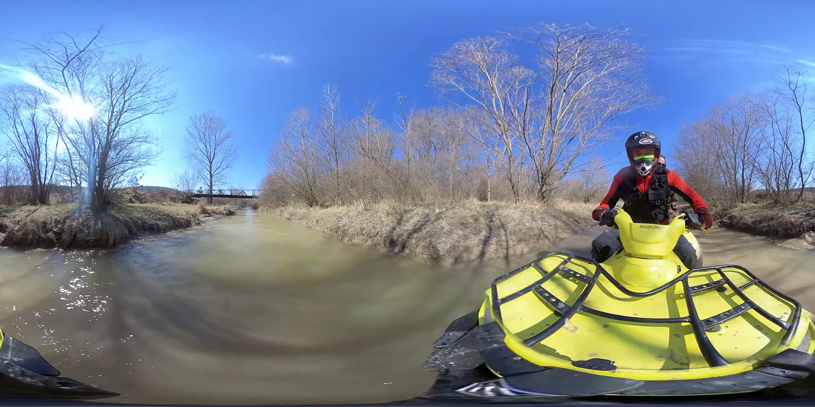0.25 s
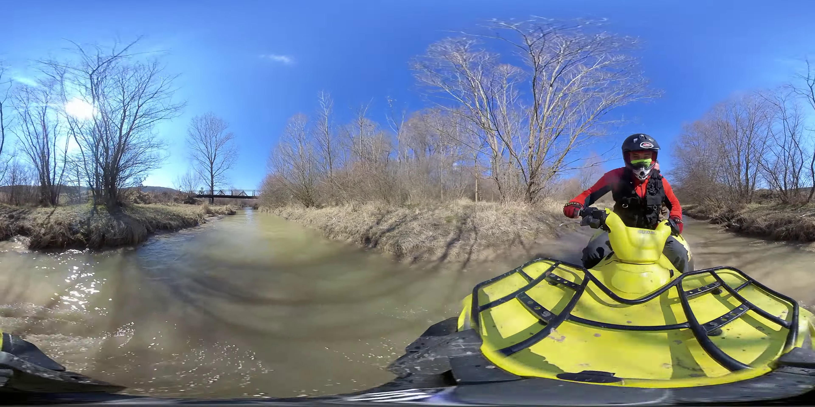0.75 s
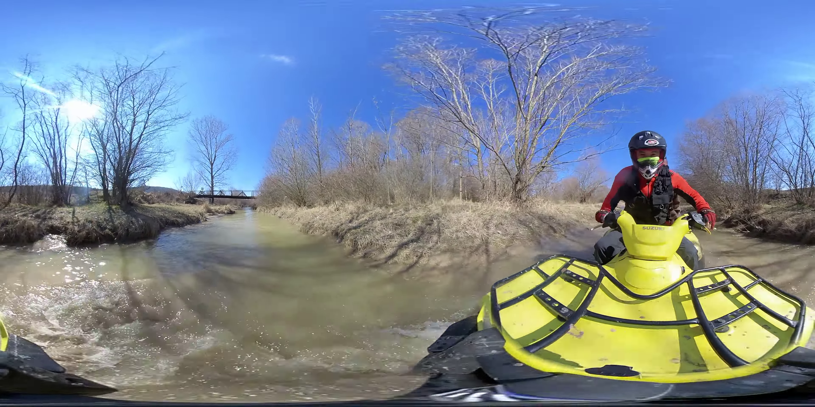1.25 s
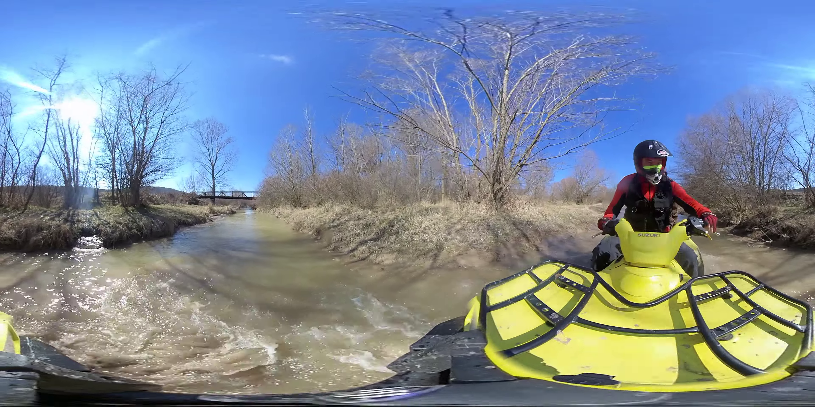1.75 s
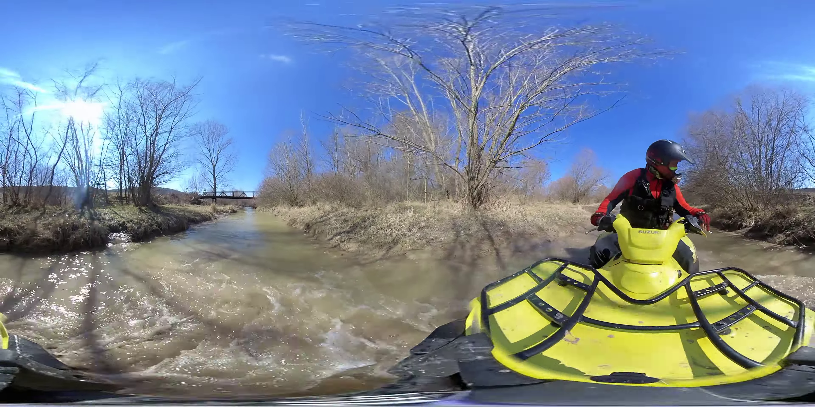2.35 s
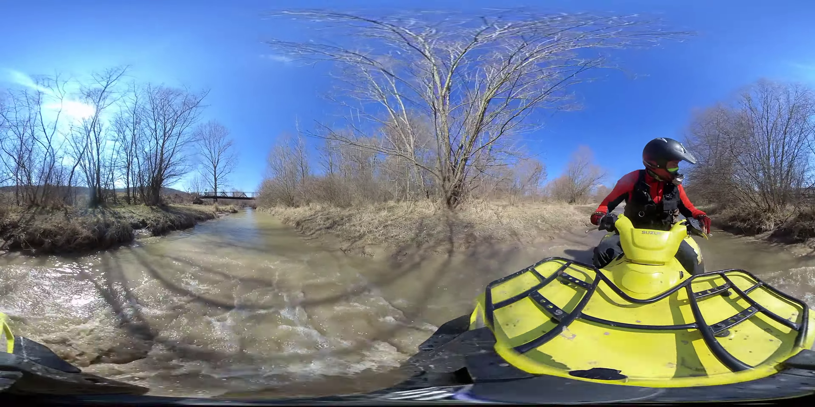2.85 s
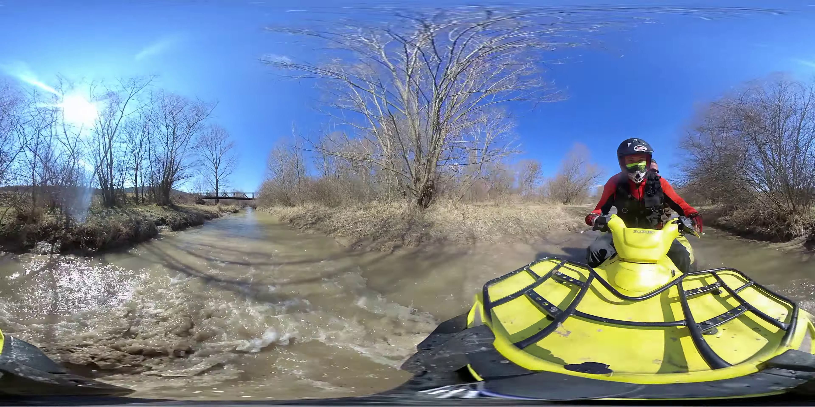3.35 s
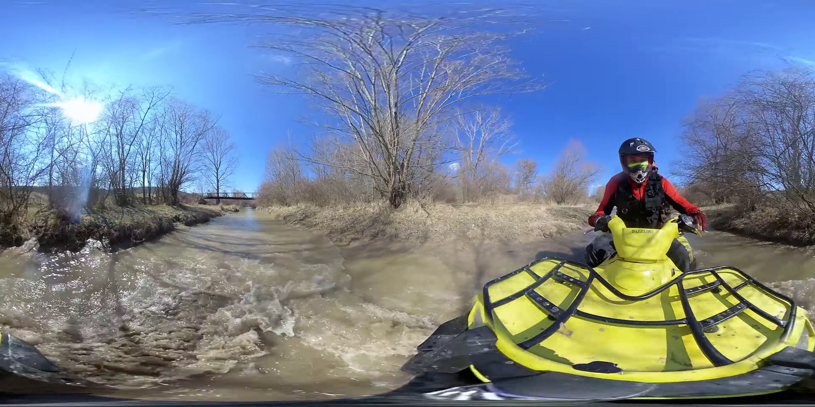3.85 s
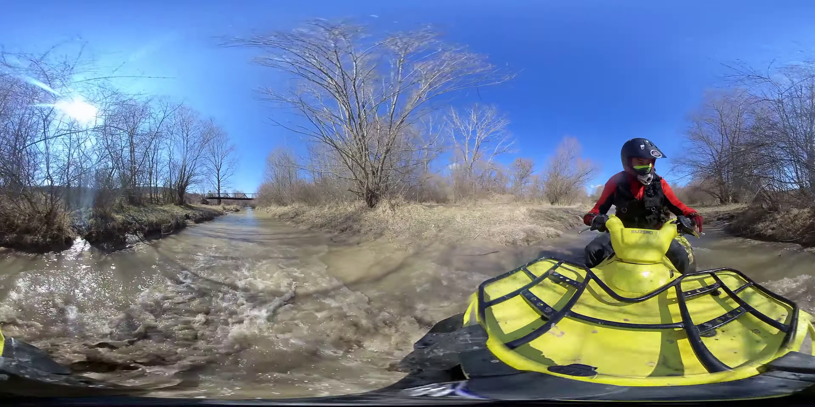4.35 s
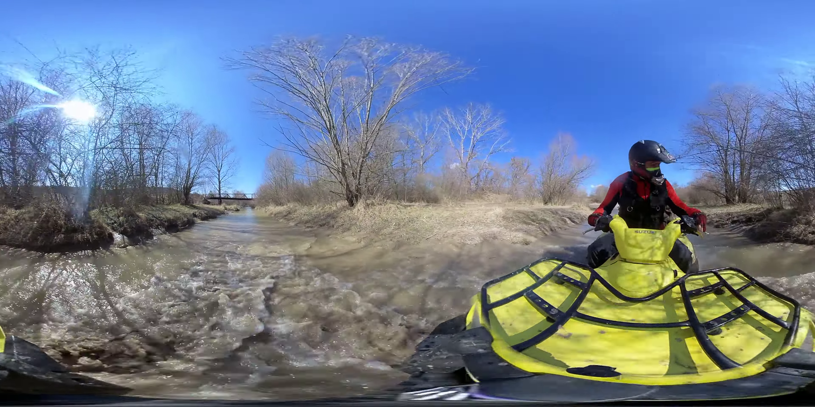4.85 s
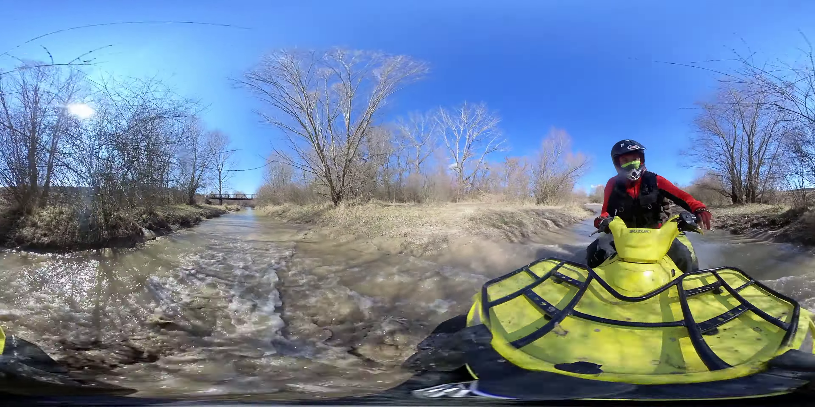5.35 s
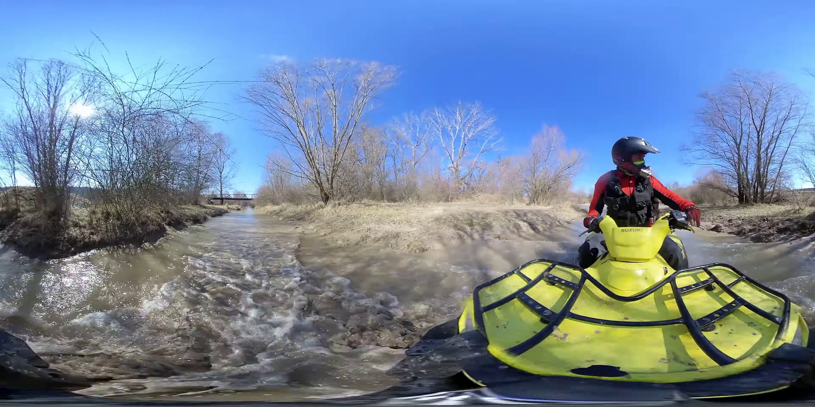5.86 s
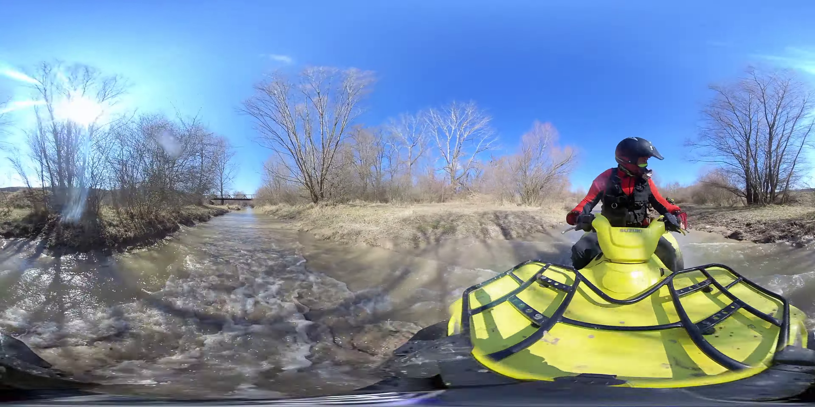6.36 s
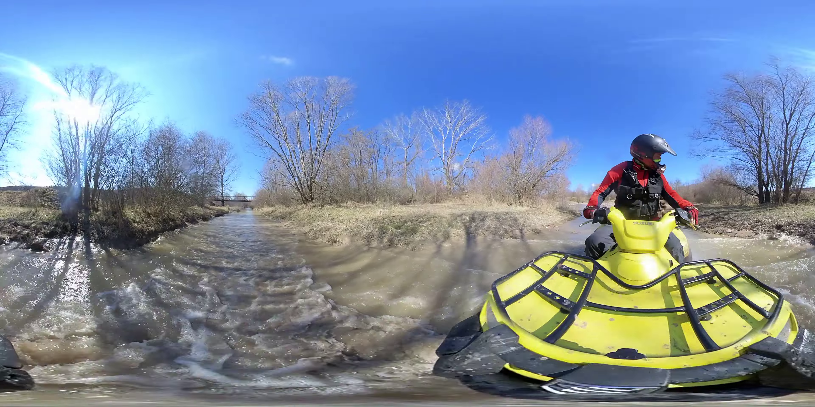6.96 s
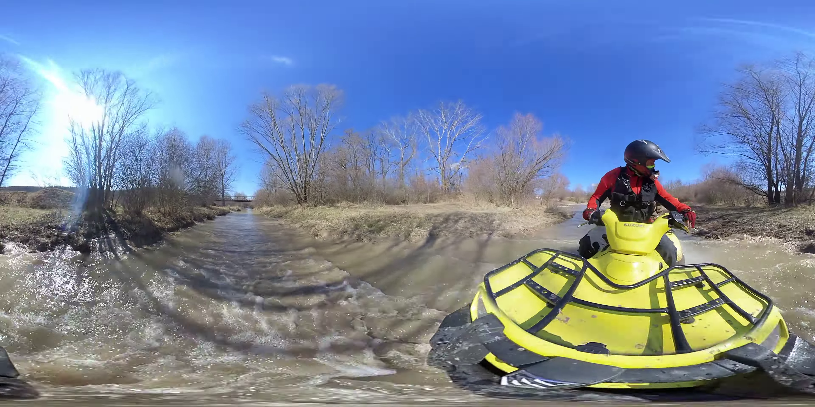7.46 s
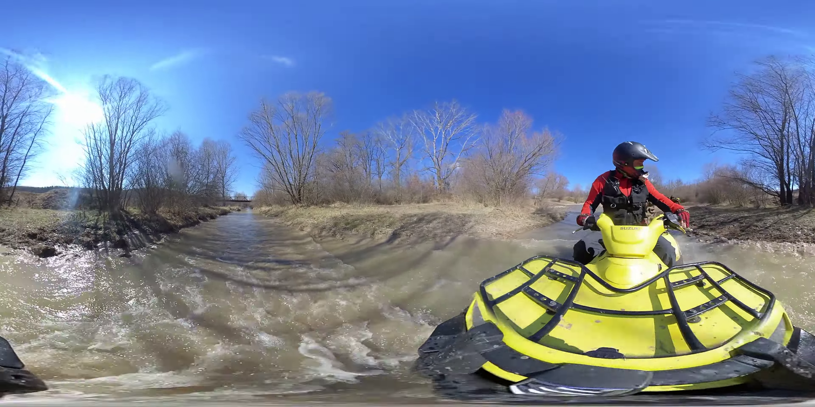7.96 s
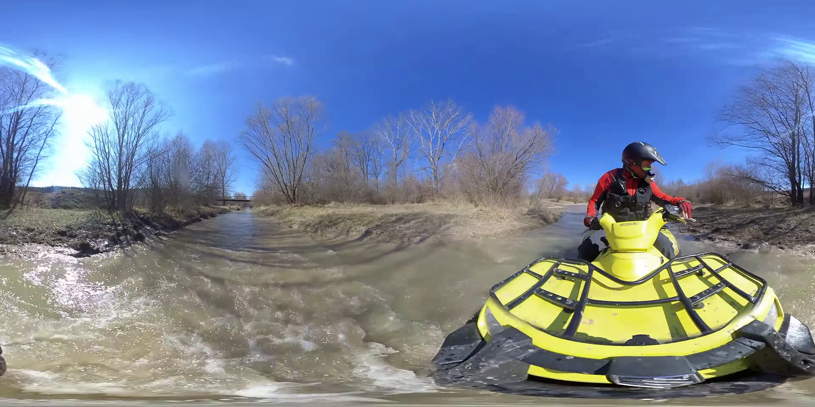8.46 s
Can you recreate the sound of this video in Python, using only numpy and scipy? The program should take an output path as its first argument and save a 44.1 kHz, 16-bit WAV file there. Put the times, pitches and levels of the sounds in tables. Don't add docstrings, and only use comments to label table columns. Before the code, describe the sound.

A quad bike wades a shallow creek outdoors, heard from microphones fixed to its front rack. A low, buzzing engine throb dominates, sagging near two seconds then pulling again. Loose panel knocks and dry clamp ticks cluster early, mostly at right, over churning water and fine spray. Later the bed gets rougher, with heavy rumbling, stone thumps and hard jolts that overload the input.

```python
import sys
import numpy as np
from scipy import signal
from scipy.fft import rfft, irfft, next_fast_len
from scipy.io import wavfile
from scipy.ndimage import uniform_filter1d, map_coordinates

SR = 44100
rng = np.random.default_rng(int(sys.argv[2]) if len(sys.argv) > 2 else 0)


def wav_out(sig):
    wavfile.write(sys.argv[1], SR, np.round(np.clip(np.atleast_2d(sig).T, -1, 1) * 32767).astype(np.int16))


def amplitude_ratio(level_db):
    exponent = np.asarray(level_db, float) / 20
    return 10 ** exponent


N = 384111

# t/s, f/Hz
CYCLE = [(0, 26.6), (.7, 29.3), (1.33, 29), (1.5, 22), (2, 19.3), (2.25, 21.4), (2.64, 26.8), (3.3, 28.2),
         (4.15, 27.8), (4.8, 28.7), (5.72, 28.1), (5.97, 25.3), (6.65, 26.3), (7.1, 25.2), (7.52, 25.2),
         (7.9, 30.6), (8.12, 23.2), (8.71, 25.5)]
# t/s, level/dB
LOAD = [(0, 2), (.5, 1), (1, 2), (1.52, -1), (2, -6), (2.5, 2.5), (3.1, 0.5), (3.9, 1.5), (4.2, -4),
        (4.6, 1), (5.6, 0.5), (6.1, -2), (6.6, 1), (7.3, -3.5), (7.65, 3), (7.9, -0.5), (8.25, -0.5),
        (8.71, -7.5)]
# f/Hz, level/dB
MOUNT = [(40, -40), (56, -28), (66, -22), (76, -9.5), (86, -8), (103, -8), (114, -14), (128, -18),
         (142, -17), (170, -25), (200, -29), (227, -23), (255, -30), (283, -22)]
# f/Hz, left-right/dB
MOUNT_PAN = [(60, -4), (85, -4), (110, 4.5), (140, 2), (200, 3)]
# f/Hz, width/Hz, level/dB
FRAME = [(112.3, 43.2, -5), (186.3, 67.7, -0.5), (235, 29.7, -1.5), (284.6, 35.7, -4), (466, 68.8, -9.5)]
# f/Hz, likeness/0-1
ALIKE = [(30, .1), (100, 0.55), (160, 0.85), (230, 0.31), (300, 0.88), (390, 0.47), (480, 0.6), (800, 0.34),
         (1500, 0.24), (3000, 0.13)]


def engine():
    cycle_hz, load_db = curves(CYCLE)[0], curves(LOAD)[0]
    phase = 2 * np.pi * np.cumsum(cycle_hz) / SR
    tones = 0
    for order in range(2, 11):
        port_drift = .28 * np.array([wobble(7), wobble(7)])
        drift = .05 * order * wobble(5) + order * order + port_drift
        port_db = 1.1 * np.array([wobble(8), wobble(8)])
        size = amplitude_ratio(along(MOUNT, order * cycle_hz) + load_db + port_db)
        tones = tones + size * np.sin(order * phase + drift)

    throb = amplitude_ratio(0.86 * np.cos(phase))
    shake = filtered(throb * rush(ALIKE, patchy_db=1.0), resonances(FRAME))
    shaken = shaking(db=-18, follows=0.1644)
    rumble = amplitude_ratio(8) * shaken * unit(filtered(shake, lambda hz: hz ** 2 / (hz ** 2 + 60 ** 2)))

    sway = resonances([(92.5, 23.0, 0)])
    bounce = filtered(rng.standard_normal(N), lambda hz: sway(hz) ** 2)
    bounce = amplitude_ratio(2.5) * shaken * unit(bounce)

    def tilt(hz):
        return ports(hz) * amplitude_ratio(along(MOUNT_PAN, hz) * [[.5], [-.5]])

    return filtered(amplitude_ratio(3) * tones, tilt) + bounce + filtered(rumble, ports)


# t/s, peak level/dB, left-right/dB
SLAMS = [(0.419, -13, -2), (2.176, -23, 0), (3.108, -7, -10), (6.377, -10, 0), (0.552, -9, 14),
         (1.117, -12, -8), (1.807, -14, 5), (2.033, -19, -12), (2.227, -4, -2), (2.396, -11, -12),
         (2.541, -9.5, -19), (5.549, 0, -5), (5.901, -17, 19), (6.555, -9, 9), (7.234, -6, -22),
         (7.33, 0.5, 3), (7.727, -32, -5), (8.234, -7, 2), (8.349, -6, -15), (8.45, -3.5, -13),
         (8.601, -2, -26)]


def slams():
    out, t = np.zeros((2, N + SR)), np.arange(SR // 20) / SR
    fall = amplitude_ratio(-60 * t / 0.015) * (1 - np.exp(-t / 0.005))
    thud = 0.33 * np.sin(2 * np.pi * (330 * t + 12000 * t * t))
    for s, db, pan_db in SLAMS:
        crack = fall * (1.9 * rng.standard_normal(len(t)) + thud)
        crack[round(0.001 * SR)] += 3
        level_db = db + 15.0 + pan_db * np.array([[.5], [-.5]])
        out[:, round(s * SR):][:, :len(t)] += amplitude_ratio(level_db) * crack
    rack = resonances([(600, 500, 0), (1400, 900, -6)])
    return filtered(out[:, :N], lambda hz: rack(hz) / (1 + 1j * hz / 4000))


# t/s (peak), rise/dB, half length/s
SINGS = [(.23, 3, .03), (.32, 4, .02), (1.77, 1, .04), (1.82, 10, .03), (1.96, 6.5, .03), (2.055, 7, .03),
         (2.29, 3.5, .03), (3.05, 1, 0.046), (3.87, 4.5, .05), (4.42, -0.5, 0.055), (5.66, -5, 0.043),
         (5.9, 0.5, .05), (6.1, 0.5, 0.055), (7.1, 0, 0.043), (7.57, 3, 0.034), (8.55, 3, 0.036),
         (8.68, 7, .03)]
# t/s, peak level/dB, ring f/Hz
KNOCKS = [(0.113, -26, 620), (0.267, -10, 620), (0.356, -15, 630), (0.419, -12, 666), (0.462, -8.5, 566),
          (0.48, -11, 667), (0.489, -15, 690), (0.553, -11, 575), (0.662, -8.5, 686), (0.789, -14, 625),
          (0.881, -17, 670), (0.947, -10.5, 600), (1.119, -18, 729), (1.173, -8.5, 690), (1.58, -12, 634),
          (1.744, -13, 670), (1.806, -8.5, 616), (1.834, -19, 670), (1.952, -12, 665), (2.034, -8, 700),
          (2.072, -2.5, 680), (2.128, -9, 660), (2.176, -14, 660), (2.228, -4.5, 616), (2.419, -6, 633),
          (2.542, -8, 673), (2.616, -13, 586), (2.876, -16.5, 600), (2.973, -21, 632), (3.035, -19, 636),
          (3.112, -12.5, 577), (3.189, -11.5, 633), (3.23, -6.5, 643), (3.284, -23, 647), (3.392, -12, 583),
          (3.622, -11, 570), (3.746, -13, 630), (4.139, -13, 600), (4.673, -12.5, 670), (4.779, -5.5, 638),
          (5.153, -10.5, 620), (5.235, -9.5, 666), (5.304, -14, 605), (5.328, -12, 620),
          (5.374, -10.5, 620), (5.535, -10, 620), (5.706, -27, 650), (5.899, -6, 720), (5.973, -13, 654),
          (6.155, -25, 636), (6.219, -13, 666), (6.379, -8.5, 750), (7.234, -8, 606), (7.734, -23, 580),
          (7.812, -7, 610), (7.856, -21, 646), (8.237, -7.5, 660), (8.454, -11, 716), (8.611, -20, 684),
          (8.693, -10.5, 634)]
# t/s, length/s, rate/Hz, level/dB
RATTLES = [(.0045, .103, 81.5, -11.5), (.1266, .02, 81.5, -9.5), (.1625, .02, 81.5, -10),
           (.197, .01, 82, -17), (.2315, .06, 83, -21), (.675, .06, 87, -18), (.85, .06, 87, -18),
           (.9755, .01, 87, -13), (7.8, .08, 88, -17), (1.7335, .015, 85, -14), (2.6717, .12, 27.6, -18),
           (2.8548, .16, 27.6, -14), (3.4984, .08, 27.7, -18), (7.397, .03, 85, -16),
           (7.6936, .02, 88, -10), (7.7297, .01, 82, -9), (7.7545, .02, 82, -10), (8.578, .08, 83, -14)]
# t/s, peak level/dB, ring f/Hz
TICKS = [(.281, -17, 1450), (.5132, -12, 1350), (.528, -14, 1500), (.657, -21, 1910), (1.6427, -14, 1590),
         (1.7794, -16, 1660), (1.838, -13, 1600), (2.4014, -12, 1550), (2.5401, -18, 1380),
         (2.7447, -22, 1370), (2.7811, -14.5, 1450), (2.792, -19, 1490), (2.9267, -6.5, 1460),
         (2.9881, -12, 1360), (3.3109, -18, 1440), (5.6261, -14, 1630), (7.5158, -15, 1450),
         (8.2192, -25, 1510), (8.2332, -8.5, 1620), (8.432, -10, 1610), (8.577, -3, 1480),
         (.553, -12.5, 1320), (.9635, -17, 1410), (1.655, -13, 1400), (1.7216, -8, 1620),
         (1.8067, -6, 1390), (1.884, -10, 1590), (1.894, -7, 1560), (1.947, -1, 1580), (2.0478, -10, 1550),
         (2.1122, -10, 1540), (2.18, -16, 1580), (2.205, -10, 1560), (2.226, -6, 1370), (2.3215, -12, 1450),
         (2.428, -11, 1460), (2.5315, -13, 1500), (3.3228, -11, 1330), (3.9972, -11, 1490),
         (6.1401, -15, 1390), (6.5559, -7.5, 1450), (6.8354, -15, 1520), (7.2375, -10, 1300),
         (7.3334, -14, 1190), (7.8484, -13.5, 1580), (7.9489, -11.5, 1360), (8.3478, -18, 1400),
         (8.4192, -7, 1600), (8.4507, -3, 1370), (8.5662, -5, 1495), (5.555, -17, 1500), (5.377, -16, 1610),
         (7.27, -14, 1300), (2.38, -20, 1500), (2.4565, -26, 1500)]


def panel():
    swing = 2 * np.pi * np.cumsum(3 * curves(CYCLE)[0]) / SR
    bumps = amplitude_ratio(7 * np.cos(swing) + 1.8 * wobble(30)) * rng.standard_normal(N)
    sheet = resonances([(634, 55, 0), (740, 220, -10)])
    buzz = unit(filtered(bumps, lambda hz: sheet(hz) / (1 + 1j * hz / 2500) ** 2))
    buzz = amplitude_ratio(5.0 + swells(SINGS)) * shaking(db=-22.5) * buzz
    knocks = amplitude_ratio(13.5) * rings(KNOCKS, t60=0.034, attack=0.001, crack=0.1, sag=.33)

    train = []
    for start_s, span_s, rate_hz, db in RATTLES:
        for s in np.arange(start_s, start_s + span_s, 1 / rate_hz):
            train.append((s, db + rng.normal(0, .8), rng.normal(1505, 45)))
    answers = [(s, db, 640) for s, db, _ in train]
    answers = amplitude_ratio(14) * rings(answers, t60=0.0085, attack=0.00085, crack=0)

    contacts = list(TICKS) + train + stray(count=12, db=-22, scatter_db=3, hz=1420, scatter_hz=150)
    ticks = amplitude_ratio(10) * rings(contacts, t60=.0085, attack=0.0004, crack=0.12)
    chatter = grains(count=700, pitch_hz=1450, spread=0.204, cycles=12.0, size_db=-0.5)
    ticks = ticks + amplitude_ratio(-35.5 + 5.1 * np.cos(swing)) * chatter
    return (buzz + knocks + answers) * amplitude_ratio([[-19], [0]]) + ticks * amplitude_ratio([[-10], [0]])


# t/s, level/dB
BED = [(0, -41), (.24, -35), (.7, -41), (2.03, -16.5), (2.38, -44), (5.68, -18.5), (5.94, -22),
       (6.57, -15.5), (7.18, -15.5), (7.88, -28.5), (8.03, -14.5), (8.3, -24)]
# t/s, peak level/dB, ring f/Hz
THUMPS = [(.4, -15, 84), (1.3, -14, 462), (1.49, -17, 91), (1.72, -11, 95), (2.02, -12, 167),
          (3.42, -19, 281), (4.82, -13, 312), (5.98, -11, 75), (7.02, -8, 150), (7.3, -15, 194),
          (7.57, -12, 171), (8.12, -1, 93), (8.24, -14, 93), (8.32, -7, 185)]


def lurch():
    heave = unit(filtered(rng.standard_normal((2, N)), resonances([(41.8, 210, 0)])))
    thump = unit(filtered(rng.standard_normal((2, N)), resonances([(122.4, 67, 0)])))
    whine = unit(filtered(rng.standard_normal((2, N)), resonances([(3030, 63, 0)])))
    low = amplitude_ratio([[5], [3.5]]) * filtered(heave, lambda hz: hz < 90)
    low = low + amplitude_ratio(7) * filtered(thump, lambda hz: hz < 220)
    low_thumps = amplitude_ratio(4) * rings(THUMPS, t60=0.17, attack=0.011, crack=0)
    return amplitude_ratio(curves(BED)[0]) * low + amplitude_ratio(-62.0) * whine + low_thumps


# t/s, level/dB
SPRAY = [(0, -40), (.9, -39), (1.14, -35), (1.53, -33), (1.7, -28), (1.84, -32), (2.42, -36), (2.45, -42.5),
         (2.75, -42.5), (3.86, -34.5), (4.2, -38), (5.2, -35), (6.04, -39), (6.3, -38), (7.2, -42.5),
         (7.9, -39), (8.71, -40.5)]
# t/s (peak), rise/dB, half length/s
SPLASHES = [(1.2, 3, 0.071), (1.76, 2, .05), (1.957, 3, .03), (2.04, 5, 0.024), (2.19, 5, 0.011),
            (2.393, 1, 0.017), (3.704, 0.5, .04), (3.873, 2, .05), (4.405, 2.5, .06), (4.89, 4, 0.049),
            (5.293, 2, .03), (5.75, 2.5, 0.023), (5.914, 4.5, 0.067), (6.247, 5.5, .03), (6.46, 4.5, .03),
            (6.573, 3.5, 0.044), (7.02, 6, 0.11), (7.24, 6, .012), (7.456, 4, .03), (7.58, 0, 0.026),
            (7.96, 2.5, 0.094), (8.348, 4.5, 0.033), (8.554, 6, 0.027), (8.615, 4, .03)]
# f/Hz, level/dB per Hz
CHURN = [(300, -66), (500, 13), (800, -3.5), (1200, -1), (1600, -4), (2200, -6.5), (3000, -11),
         (4000, -30.5), (6000, -59)]
# f/Hz, level/dB per Hz
SPRAY_LEFT = [(1500, -40), (3000, -2), (5000, -2), (9000, -2), (12000, 1), (14000, -2), (16000, -11)]
SPRAY_RIGHT = [(1500, -48), (3000, -0.5), (5000, -12.5), (8000, -17), (10000, -10), (12000, 3),
               (14500, -11.5), (16000, 0)]
# f/Hz, likeness/0-1
SPRAY_ALIKE = [(5000, 0.02), (6500, 0.23), (8500, 0.25), (10500, 0.39), (15000, 0.2)]


def water():
    spray_db = curves(SPRAY)[0] + 0.28 * wobble(14) + swells(SPLASHES)
    slosh_db = 0.7 * wobble(9) + 1.0 * wobble(26)
    churn = rush(ALIKE, patchy_db=1.0)
    churn = unit(filtered(churn, lambda hz: amplitude_ratio(along(CHURN, hz)) * ports(hz)))

    drops = [grains(count=5000, pitch_hz=9000, spread=.4, cycles=2, size_db=5) for _ in range(2)]
    fizz = unit(rush(SPRAY_ALIKE, patchy_db=4.2)) + amplitude_ratio(-9) * np.array(drops)
    spray = unit(filtered(fizz, lambda hz: amplitude_ratio([along(SPRAY_LEFT, hz), along(SPRAY_RIGHT, hz)])))

    churn_db = -30.5 + 0.49 * (spray_db + 50.0)
    return amplitude_ratio(churn_db + slosh_db) * churn + amplitude_ratio(spray_db + slosh_db) * spray


def shaking(db, follows=0):
    bed_db = curves(BED)[0]
    gust_db = wobble(12) + 0.72 * wobble(2.82)
    return amplitude_ratio(db + follows * (bed_db - bed_db.mean()) + gust_db)


# f/Hz, right lead/rad
LEAD = [(40, 2.6), (83, 2.4), (92, 1.7), (102, 2.3), (112, 2.9), (145, 2.7), (200, 2), (300, 2.8),
        (500, 2.5), (900, 0.3), (1500, -0.4), (3500, -2.9)]


def ports(hz):
    return np.exp(.5j * along(LEAD, hz) * [[-1], [1]])


def rush(alike, patchy_db):
    z = signal.stft(rng.standard_normal((2, N)), nperseg=512)[2]
    field = uniform_filter1d(rng.standard_normal(z.shape[1:]), size=12, axis=0)
    field = uniform_filter1d(field, size=3, axis=1)
    pair = signal.istft(z * amplitude_ratio(patchy_db * unit(field)), nperseg=512)[1][:, :N]

    def mid_side(hz):
        turn = np.arccos(np.clip(along(alike, hz), -1, 1)) / 2
        return np.array([np.cos(turn), np.sin(turn)])

    mid, side = filtered(pair, mid_side)
    return np.array([mid + side, mid - side])


def rings(events, t60, attack, crack, sag=0):
    out, t = np.zeros(N + SR), np.arange(SR // 10) / SR
    shape = amplitude_ratio(-60 * t / t60) * (1 - np.exp(-t / attack))
    stiffen_s = .003
    bent = t - sag * stiffen_s * (1 - np.exp(-t / stiffen_s))
    for s, db, hz in events:
        noise = uniform_filter1d(rng.standard_normal(len(t)), size=13)
        snap = crack * amplitude_ratio(-60 * t / 0.0036) * noise
        out[round(s * SR):][:len(t)] += amplitude_ratio(db) * (shape * np.sin(2 * np.pi * hz * bent) + snap)
    return out[:N]


def grains(count, pitch_hz, spread, cycles, size_db):
    draw = rng.random((count, 2))
    hz = pitch_hz * np.exp(spread * rng.standard_normal(count))
    hz = np.clip(hz, 300, 15000)[:, None]
    t = np.arange(512) / SR
    size = amplitude_ratio(-size_db * np.log(1 - .97 * draw[:, 1:]))
    wave = size * np.exp(-t * hz / cycles) * np.sin(2 * np.pi * hz * t)
    at = (draw[:, :1] * N).astype(int) + np.arange(512)
    return unit(np.bincount(at.ravel(), wave.ravel(), N + 512)[:N])


def stray(count, db, scatter_db, hz, scatter_hz):
    s = rng.uniform(0, N / SR, count)
    return list(zip(s, rng.normal(db, scatter_db, count), rng.normal(hz, scatter_hz, count)))


def swells(rows):
    t = np.arange(N) / SR
    return sum(db * np.exp(-((t - s) / half_s) ** 2) for s, db, half_s in rows)


def resonances(modes):
    def response(f):
        total = 0
        for k, (center, width, db) in enumerate(modes):
            damping = 1j * f * width
            total = total + (-1) ** k * amplitude_ratio(db) * damping / (center * center - f * f + damping)
        return total
    return response


def filtered(x, response):
    m = next_fast_len(N + SR // 2)
    return irfft(rfft(x, m) * response(np.fft.rfftfreq(m, 1 / SR)), m)[..., :N]


def wobble(rate_hz):
    coarse = np.arange(0, N + 64, 64)
    knots = rng.standard_normal(int(N * rate_hz / SR) + 4)
    return np.interp(np.arange(N), coarse, map_coordinates(knots, [coarse * rate_hz / SR]))


def curves(rows):
    s, *cols = np.transpose(rows)
    return [np.interp(np.arange(N) / SR, s, c) for c in cols]


def along(points, hz):
    f, v = np.transpose(points)
    return np.interp(np.log(hz + 1), np.log(f + 1), v)


def unit(x):
    return x / np.sqrt(np.mean(x ** 2) + 1e-20)


def scene():
    return engine() + slams() + panel() + lurch() + water()


# t/s, depth/dB, recovery/s
DUCKS = [(0.185, 3.5, .03), (0.564, 5, 0.075), (1.815, 4, 0.24), (2.196, 2, .05), (2.428, 1.5, 0.14),
         (5.556, 3.5, 0.079), (6.285, 1.5, 0.034), (6.462, 2, 0.064), (7.074, 0.5, 0.024),
         (7.125, 2.5, 0.099), (7.244, 2, 0.025), (7.345, 2.5, 0.057), (8.25, 2.5, 0.055), (8.58, 2, 0.029),
         (8.652, -0.5, 0.035)]


def ducking():
    t = np.arange(N) / SR
    cut_db = sum(db * (t > s) * np.exp(-(np.abs(t - s) / back_s) ** 2) for s, db, back_s in DUCKS)
    return amplitude_ratio(-uniform_filter1d(cut_db, size=300))


def band_limit(x):
    return signal.sosfilt(signal.butter(12, 15720, fs=SR, output="sos"), x)


def record(dry):
    dry = dry * ducking()
    hiss = filtered(dry, lambda hz: 1 / (1 + (3000 / (hz + 1)) ** 4))
    shake = dry - hiss
    clipped = shake / (1 + np.abs(shake / .9) ** 8) ** (1 / 8)
    clipped = filtered(clipped, lambda hz: 1 / (1 + (hz / 5000) ** 2))
    return band_limit(clipped + hiss - .003)


dry = scene()
out = record(dry)
wav_out(out)
```